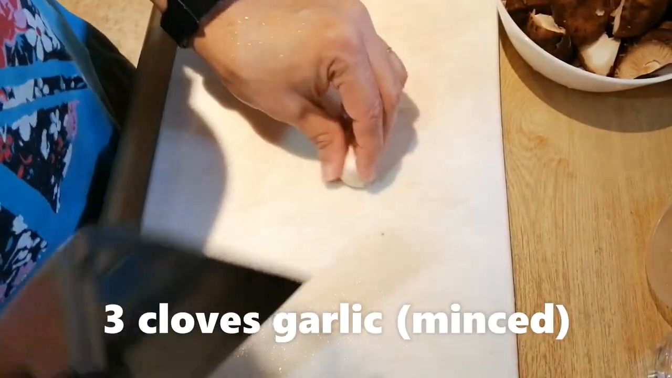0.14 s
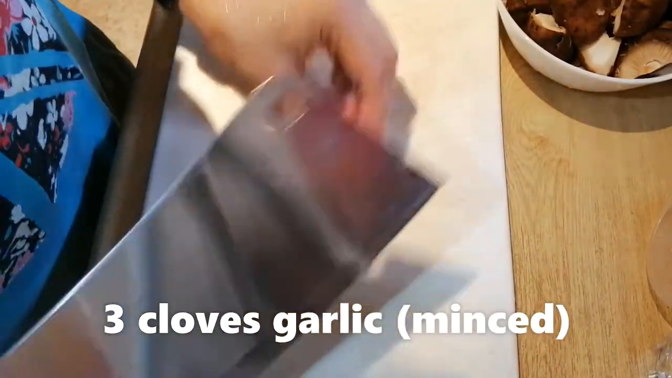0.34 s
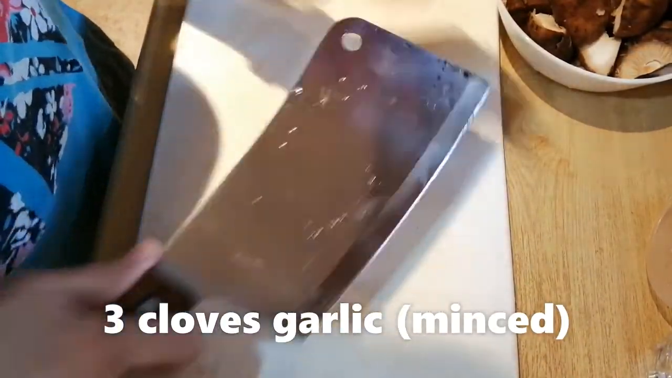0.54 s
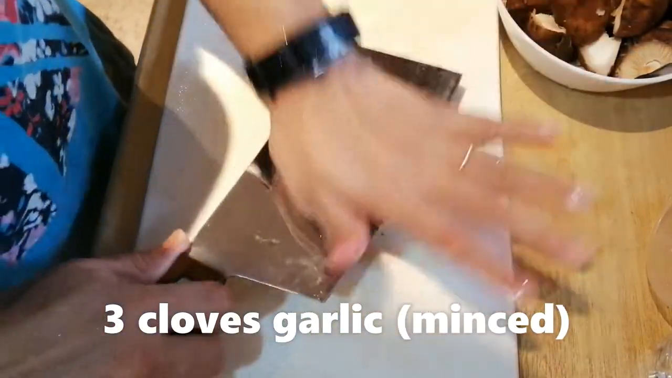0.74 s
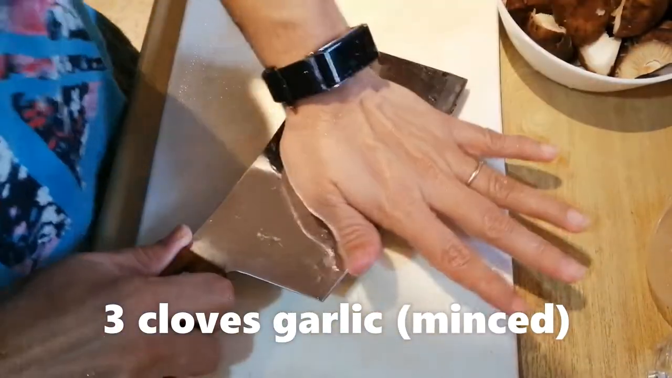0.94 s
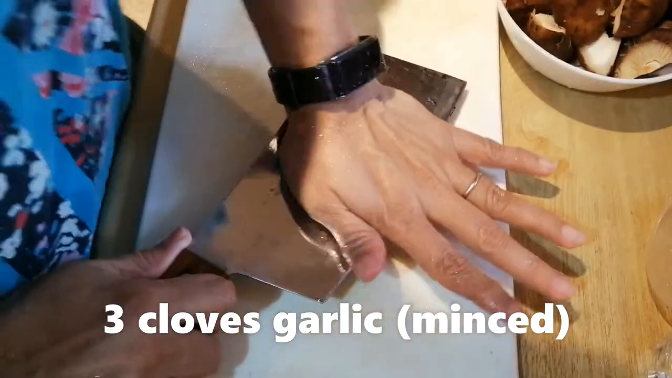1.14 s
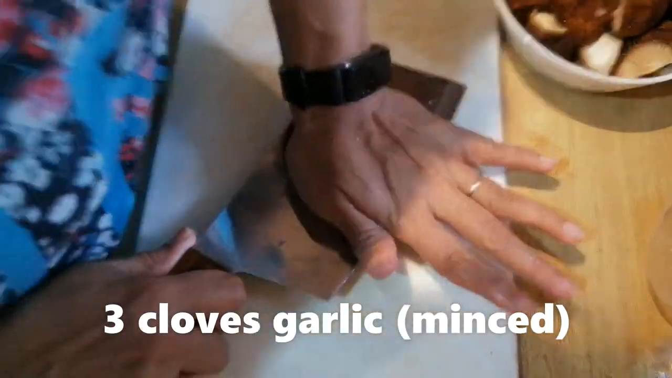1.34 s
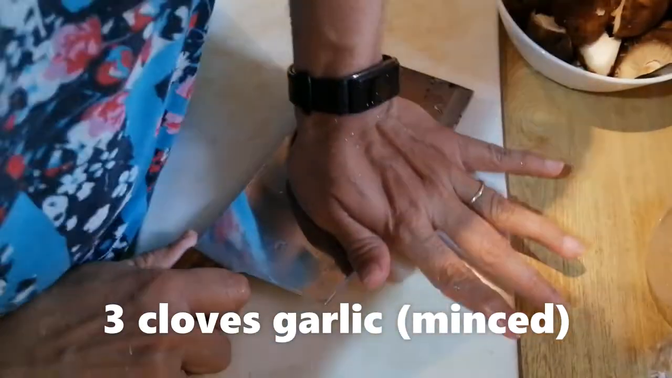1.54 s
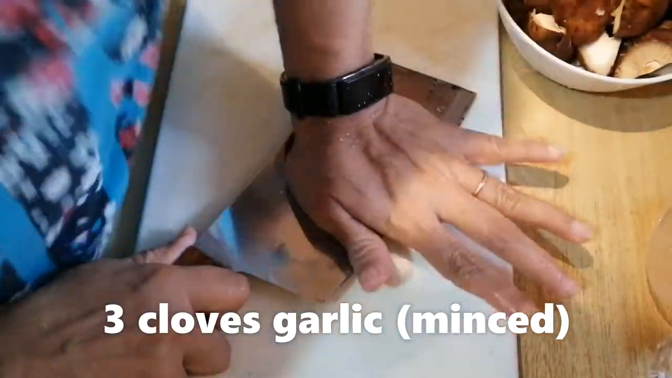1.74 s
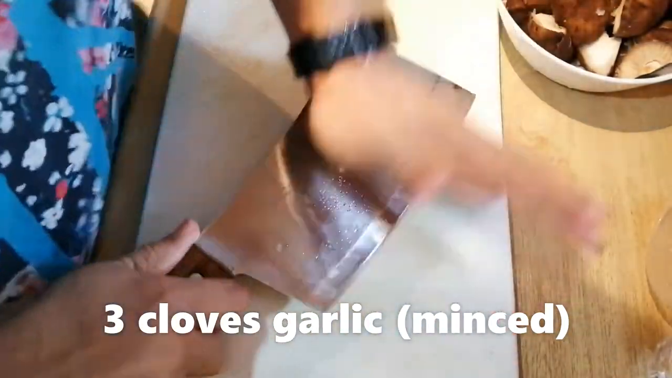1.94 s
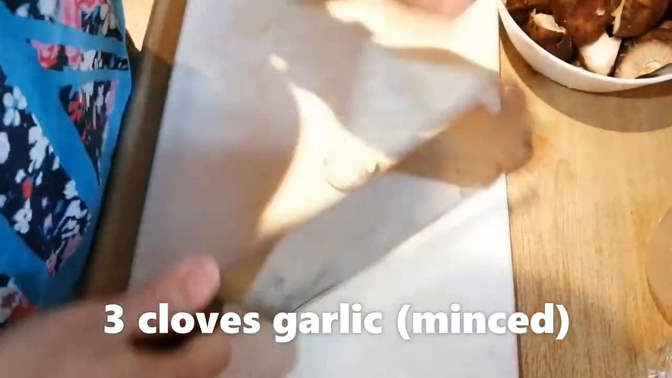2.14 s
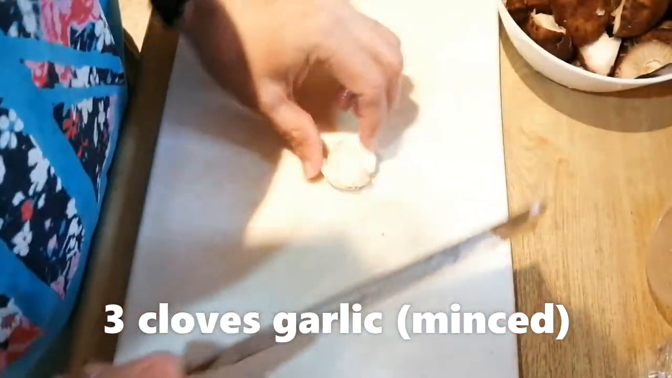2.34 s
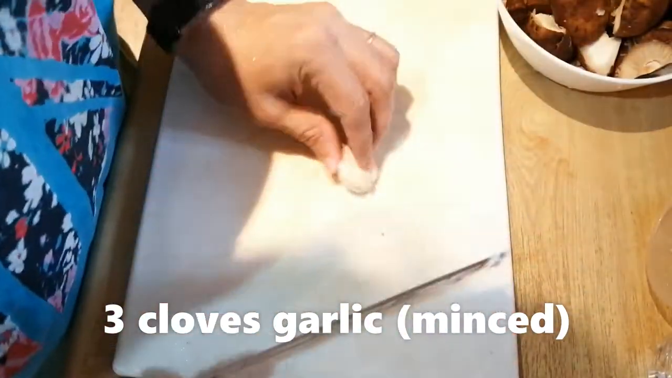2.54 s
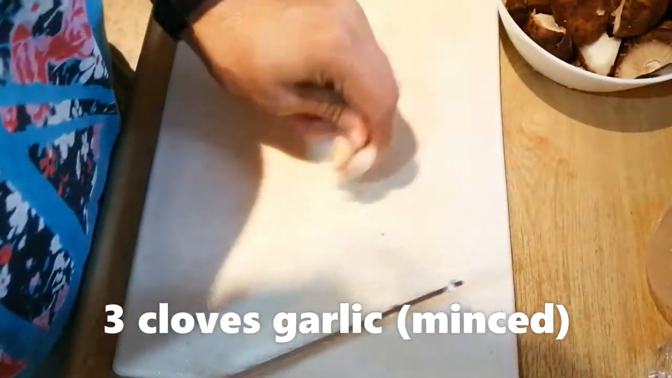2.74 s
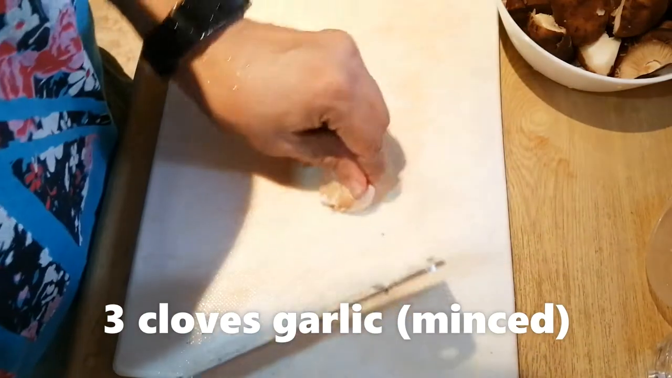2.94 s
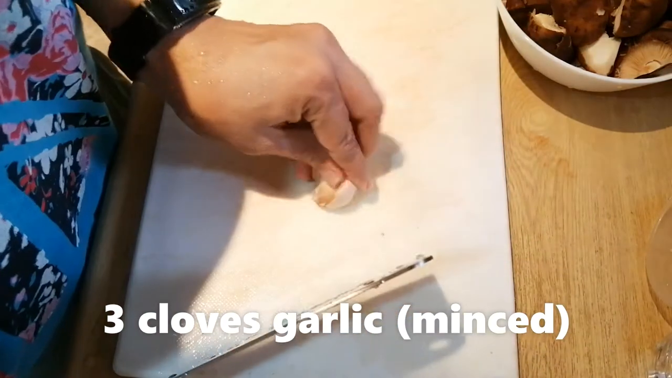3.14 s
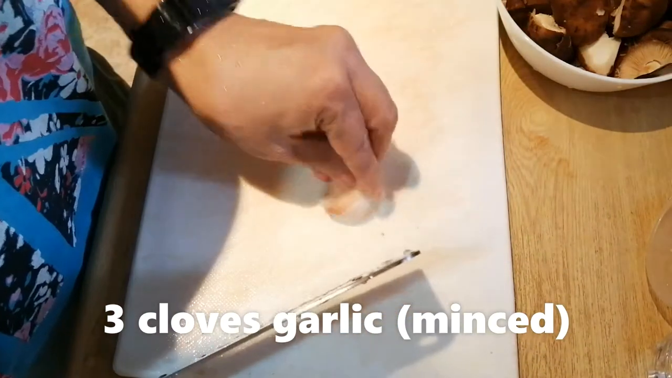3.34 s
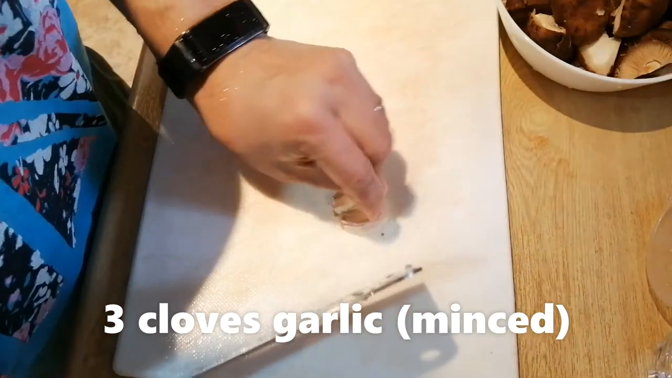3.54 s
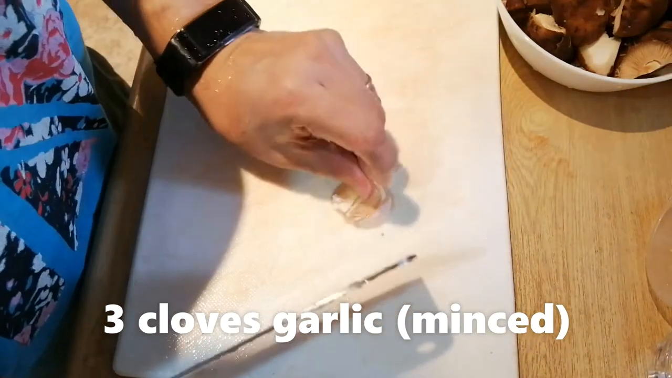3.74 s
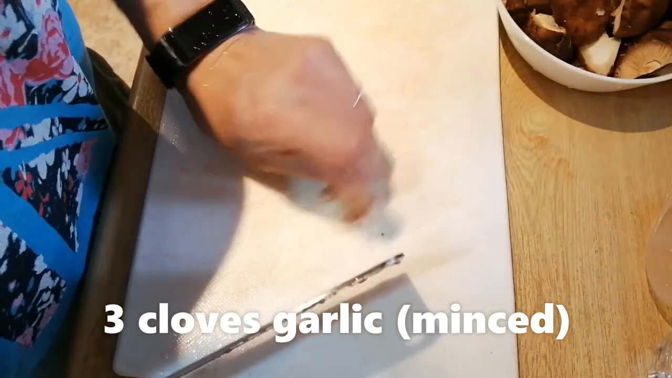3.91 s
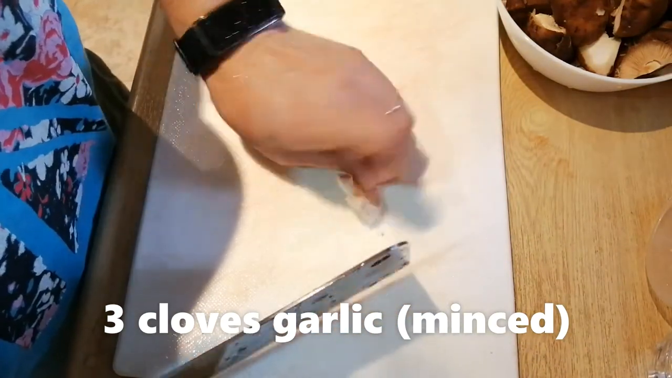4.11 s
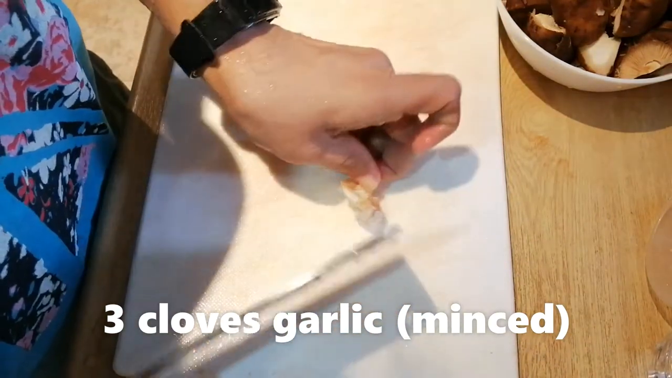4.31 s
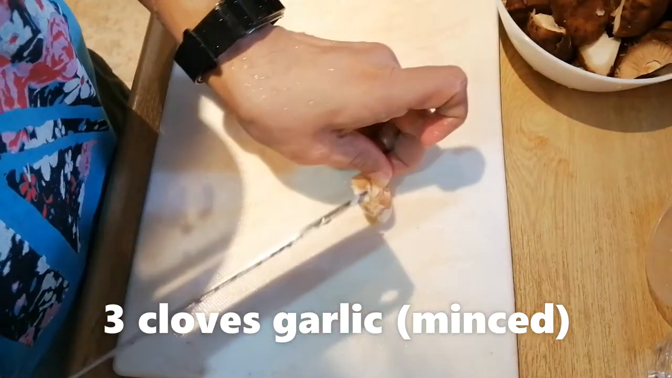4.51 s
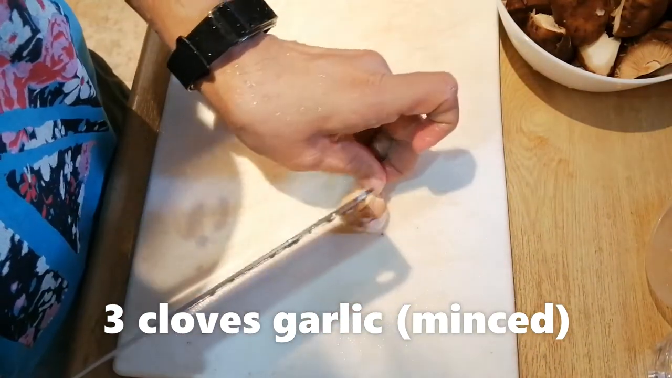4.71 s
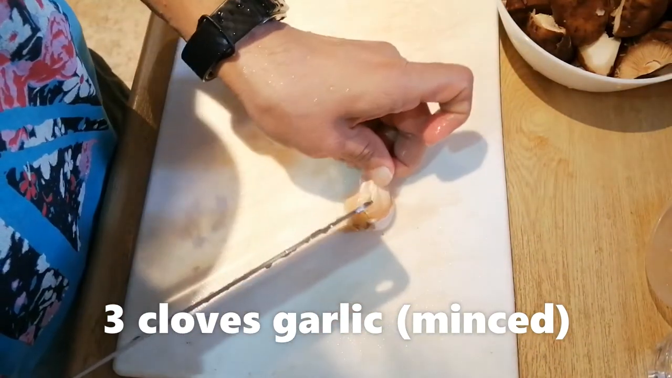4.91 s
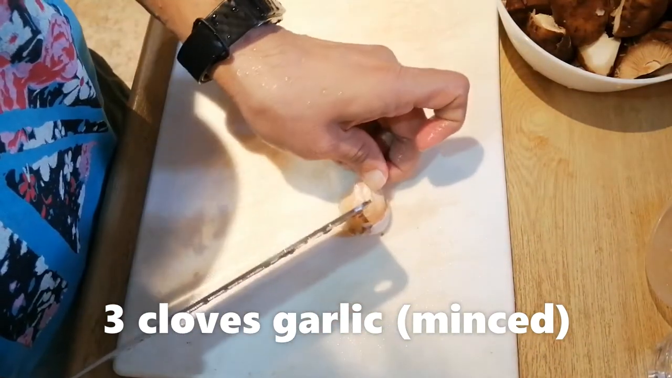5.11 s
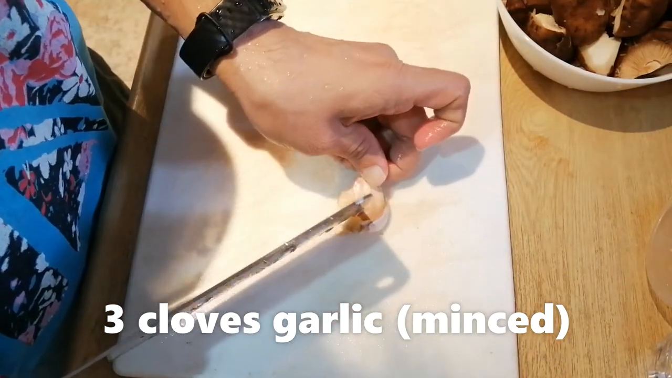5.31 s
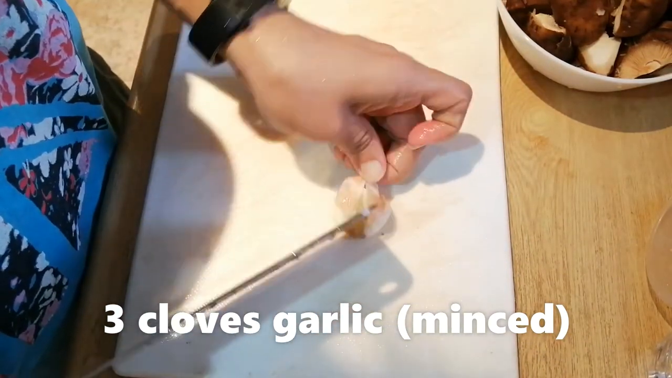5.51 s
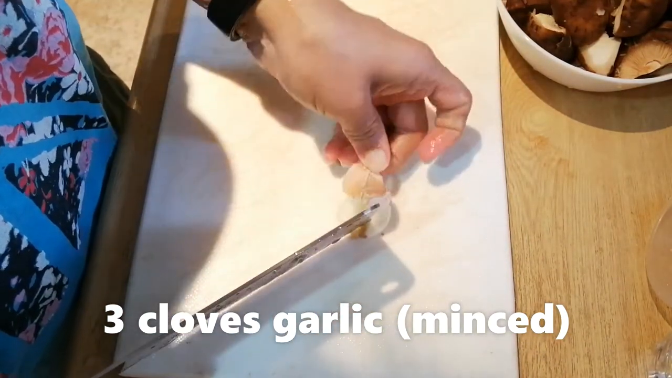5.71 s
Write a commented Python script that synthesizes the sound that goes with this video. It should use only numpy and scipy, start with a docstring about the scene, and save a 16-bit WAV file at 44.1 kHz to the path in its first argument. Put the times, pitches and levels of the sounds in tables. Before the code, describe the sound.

Close by in a hard-walled kitchen, garlic is crushed on a plastic cutting board: first a few dull thuds of a hand on a cleaver, then a loud cluster of clacks and cracks as the clove gives way. One more clack follows, and things turn much quieter, with scattered papery snaps of peeling and a short, crisp crunch of cutting near the end. Soft ventilation noise runs underneath.

```python
"""A garlic clove is crushed under the flat of a steel cleaver on a plastic cutting board, in a hard-walled kitchen.
A palm thuds onto the blade, the clove cracks and gives way in a few clacks, and the cleaver is set on its edge.
Fingers then pick at the papery skin and the edge crunches through the clove, over a low steady room noise."""
import sys
import numpy as np
from scipy import signal
from scipy.fft import rfft, irfft, next_fast_len
from scipy.io import wavfile
from scipy.ndimage import map_coordinates

SR = 44100
rng = np.random.default_rng(int(sys.argv[2]) if len(sys.argv) > 2 else 0)


def bounce(signal):
    """Save signal as a 16-bit WAV file at the path given by the first command-line argument."""
    frames = np.transpose(np.atleast_2d(signal))
    limited = np.clip(frames, -1, 1)
    pcm = np.round(limited * 32767).astype(np.int16)
    wavfile.write(sys.argv[1], SR, pcm)


N = 258426

# hard contacts of clove, blade and board: (s, clack dB, brightness Hz, board knock dB, knock cut-off Hz, room dB)
CLACKS = [(0.0171, -62, 3000, -41, 555, -1), (0.8453, -57, 1400, -46.5, 610, 7.5), (1.1397, -37, 8200, -35, 905, -1.5),
          (1.3006, -21.5, 3450, -21, 1370, -3), (1.395, -25, 7400, -26, 426, -15.5), (1.403, -29, 6440, -23, 380, -4),
          (1.4092, -27.5, 2500, -24, 360, -2), (1.486, -37.5, 9800, -30, 820, -1), (1.5337, -29.5, 5400, -33, 1610, -4),
          (1.567, -41, 7960, -39, 890, -6), (1.8957, -33, 5940, -56, 1210, 1), (5.609, -60, 5000, -65.5, 1400, 6.5)]
# soft pushes of the palm through the blade: (s, dB)
THUDS = [(0.853, -32.5), (0.876, -26.5), (0.888, -25), (0.955, -38), (1.4116, -24)]
# the board on its table: (Hz, dB, t60 s)
BOARD = [(39, -9, 0.28), (74, -5, 0.15), (109, -3.5, 0.17), (136.6, -1, 0.19), (204.6, 0.5, 0.11), (258, -7.5, 0.079), (363.6, 4, 0.038),
         (455, -10, 0.095), (531.3, -8.5, 0.13), (700, -21, 0.13)]
# the blade, damped by the hand: (Hz, width Hz, dB)
BLADE = [(2785, 420, 4.5), (5260, 810, -8.5), (7430, 360, -11), (10100, 1100, -15.5)]
# light touches that ring the blade: (s, dB)
TOUCHES = [(0.1774, -67.5), (0.3582, -65), (0.8657, -44.5), (5.574, -66)]
# lone fractures under the blade or the fingers: (s, peak dB, centre Hz)
SNAPS = [(0.883, -43.5, 10450), (0.9757, -46, 3180), (1.1111, -39, 5080), (1.6652, -31, 7300), (2.598, -43.5, 10500), (2.9502, -51.5, 4680), (3.521, -44, 9920), (4.996, -40, 4970),
         (5.4655, -40, 11500), (5.5733, -37, 11000), (5.6093, -35.5, 5050), (5.6304, -36, 10400), (5.8524, -45, 3930)]
# skin squashed, rubbed or cut: (middle s, half length s, dB, centre Hz)
RUSTLES = [(1.261, 0.0018, -47.5, 9700), (1.49, 0.11, -53.5, 7500), (1.993, 0.058, -61, 7000), (3.352, 0.25, -68, 890),
           (4.039, 0.023, -64, 9800), (4.137, 0.038, -62, 8000), (4.26, 0.011, -69.5, 9000), (4.818, 0.0048, -62, 8800),
           (4.876, 0.11, -70.5, 7500), (5.612, 0.04, -58.5, 8000), (5.61, 0.0033, -44.5, 7000)]
# spectra: (Hz, dB per Hz)
CLACK_COLOUR = [(100, -15.5), (450, -34), (950, -7.5), (1280, -8.5), (1550, -1.5), (2050, 4), (3100, -0.5), (4500, -1), (6200, -3.5), (8300, -5.5), (10800, -4.5), (12500, -15), (15500, -18)]
SKIN_COLOUR = [(200, -25), (1000, 5), (3000, -3.5), (5000, -1.5), (8000, -6), (10700, -2.5), (12500, -10), (16000, -17.5)]
AIR = [(20, -7), (55, -4), (130, -5), (200, -5), (300, -8.5), (400, -14.5), (1000, -19), (1800, -27), (2900, -27), (4300, -38.5), (7000, -39.5), (8300, -46.5), (11000, -45.5), (16000, -71)]
AIR_DB = -59
ALIKE = [(60, 0.71), (180, 0.87), (550, 0.34), (1650, 0.02), (4970, 0.02), (15000, 0.023)]  # (Hz, left-right likeness)
LEAN = [(60, -1), (180, 0), (550, -0.5), (1650, -1.5), (4970, 0.5), (15000, 0.5)]  # (Hz, left-right dB)
KITCHEN = [(100, 0.99), (300, 0.57), (700, 0.78), (2500, 0.64), (6000, 0.6), (11000, 0.44), (16000, 0.71)]  # (Hz, t60 s)
ECHO = [(60, -36), (300, -3), (540, 7.5), (700, 2), (1050, 2), (2000, -2.5), (5000, 0.5), (11000, 1.5), (12500, -4), (16000, 3)]  # (Hz, dB returned by the walls)
TOP_HZ = 15700  # fixed
# the blade pressed onto the board: (Hz, width Hz, dB above the plain clack)
PRESSED = [(990, 120, 1.5), (1580, 120, -2.5), (1710, 150, -4), (2276, 120, -0.5), (2896, 110, -2), (3700, 500, -8.5)]
CLACK_LEAN_DB = 0  # left over right
CRUSH_S = (1.1, 1.7)  # while the palm bears down, every clack also bursts the clove
BURST_DB, BURST_HZ, BURST_LAG_S, BURST_HALF_S = -39, 12000, 0.002, 0.0022
BURST_CLACK_DB = -23
BURST_SHARE = 0.3  # dB of burst for each dB that the clack is over BURST_CLACK_DB
PALM_HZ = 101  # flesh passes nothing faster
# hand and clove sliding along the steel: (start s, end s, dB)
SLIDES = [(0.17, 0.376, -72.5), (0.778, 1.35, -61), (2.15, 2.444, -72.5), (4.78, 5.305, -76)]
SLIDE_ATTACK_S, SLIDE_RELEASE_S = 0.035, 0.14
# picks at the skin: a nail catches, the flake peels, then it tears off: (start s, length s, snap dB, peeling dB)
PICKS = [(2.646, 0.029, -48.5, -59.5), (2.794, 0.0278, -51, -64), (3.1, 0.0618, -50.5, -80), (3.276, 0.051, -49.5, -83),
         (3.463, 0.0822, -47, -63), (3.758, 0.045, -51, -71), (4.089, 0.029, -39.5, -67)]
CATCH_HZ, TEAR_HZ, PEEL_HZ = 10100, 5300, 8400  # where each stage is brightest
PEEL_PEAK, PEEL_WIDTH = 0.6, 0.39  # middle and half length of the peeling, as shares of the pick
# the fan's tone and its octave: (Hz, dB, brief swell dB)
FAN = [(149.1, -66.5, 2.5), (296, -72.5, 9.5)]
FAN_WIDTH_HZ, FAN_WAVER_DB, FAN_WAVERS_PER_S = 11.7, 1.5, 2.61
HANDLING_S = (2.4, 2.8)  # the fingers turn the clove, and its skin ticks now and then
TICKS_PER_S, TICK_DB, TICK_SPREAD_DB, TICK_HZ = 7, -56.5, -4, 7500
KNOCK_LOW_HZ, PALM_LOW_HZ = 72, 42  # below these, a quick knock and a slow push move little air
# the loose clove tapped on the board: (s, dB)
TAPS = [(2.596, -60), (2.648, -68)]
TAP_RING = [(2150, 450, 0), (4300, 2200, -17)]  # (Hz, width Hz, dB)
SWELL_S, SWELL_HALF_S = 4.35, 0.099


def amp(db):
    """Decibels to gain."""
    return 10 ** (np.asarray(db) / 20)


def unit(x):
    """x at rms 1."""
    return x / np.sqrt(np.mean(x ** 2) + 1e-20)


def blow(x):
    """x with the energy of 10 ms at rms 1."""
    return unit(x) * np.sqrt(SR / 100 / x.shape[-1])  # fixed


def along(points, hz):
    """(Hz, value) points read on a log axis."""
    f, v = np.transpose(points)
    return np.interp(np.log(hz + 1), np.log(f + 1), v)


def filtered(x, gain):
    """x through the causal filter with the given gain over frequency."""
    n = x.shape[-1]
    m = 2 * next_fast_len(n // 2 + 4096)
    cepstrum = irfft(np.log(np.maximum(gain(np.fft.rfftfreq(m, 1 / SR)), 1e-6)))
    cepstrum[1:m // 2] *= 2
    cepstrum[m // 2 + 1:] = 0
    return irfft(rfft(x, m) * np.exp(rfft(cepstrum)), m)[..., :n]


def add(track, s, x):
    """Mix x into the track from time s."""
    part = track[:, max(round(s * SR), 0):][:, :x.shape[-1]]
    part += x[..., :part.shape[-1]]


def pan(db):
    """Left and right gains for a level difference."""
    return amp(np.array([np.atleast_1d(db), -np.atleast_1d(db)]) / 2)


def burst(t60, spike, size):
    """One pressure spike at both microphones, then scatter from the surfaces close by."""
    x = rng.standard_normal((2, size)) * amp(-60 * np.arange(size) / SR / t60)
    x[:, 0] = spike * np.linalg.norm(x[0])
    return x


def kitchen(x, wet_db):
    """x with a diffuse tail in which each frequency dies at its own speed."""
    hz, t, z = signal.stft(rng.standard_normal((2, SR)), SR, nperseg=256)
    tail = signal.istft(z * amp(along(ECHO, hz)[:, None] - 60 * t / along(KITCHEN, hz)[:, None]), SR, nperseg=256)[1]
    tail *= 1 - np.exp(-np.arange(tail.shape[1]) / SR / 0.002)  # reflections take a moment to build up
    tail /= np.linalg.norm(tail[0])
    return x + amp(wet_db) * signal.fftconvolve(x, tail, axes=1)[:, :x.shape[-1]]


def board(cut_hz, low_hz):
    """The board after one push: low modes and a short noisy clatter of dense higher ones; soft pushes reach only the lowest."""
    t = np.arange(SR) / SR
    ring = sum(amp(db + rng.normal(0, 1) - 60 * t / t60) * np.sin(2 * np.pi * hz * t) for hz, db, t60 in BOARD)
    dense = filtered(burst(t60=0.033, spike=0.076, size=SR), lambda hz: 1 / np.hypot(1, np.log2((hz + 1) / 830) ** 2))
    both = unit(ring) * pan(5.2) + amp(-8) * unit(dense)
    radiated = lambda hz: (hz / np.hypot(hz, low_hz)) ** 3  # slow motion pushes little air
    return blow(filtered(both, lambda hz: radiated(hz) / np.hypot(1, (hz / cut_hz) ** 2)))


def steel(hz):
    """Gain of the free blade."""
    return resonances(BLADE, hz)


def crush():
    """The palm leans on the blade; each time the clove gives, it bursts and the steel clacks and knocks the board."""
    out = np.zeros((2, N))
    for s, db, bright_hz, knock_db, knock_hz, room_db in CLACKS:
        pressed = CRUSH_S[0] < s < CRUSH_S[1]
        colour = lambda hz: amp(along(CLACK_COLOUR, hz)) * (1 + pressed * resonances(PRESSED, hz)) / np.hypot(1, (hz / bright_hz) ** 3)
        clack = blow(filtered(burst(t60=0.026, spike=0.45, size=SR), colour)) * pan(CLACK_LEAN_DB)
        add(out, s, kitchen(amp(db) * clack + amp(knock_db) * board(knock_hz, KNOCK_LOW_HZ), room_db))
        if pressed:
            juice = crackle(BURST_HALF_S, BURST_DB + BURST_SHARE * (db - BURST_CLACK_DB), BURST_HZ)
            add(out, s + BURST_LAG_S - .5, kitchen(juice, wet_db=-5))
    for s, db in THUDS:
        add(out, s, kitchen(amp(db) * board(PALM_HZ, PALM_LOW_HZ), wet_db=-3.5))
    return out


def blade():
    """Touches and sliding friction excite the same damped resonances of the steel; sliding also hisses broadly."""
    t = np.arange(N) / SR
    friction = lambda hz: steel(hz) + amp(1.0) * hz / (hz + 300) / np.hypot(1, (hz / 3000) ** 1.52)
    strokes = sum(amp(db) * np.exp(-np.maximum(start - t, 0) / SLIDE_ATTACK_S - np.maximum(t - end, 0) / SLIDE_RELEASE_S)
                  for start, end, db in SLIDES)
    out = strokes * unit(filtered(rng.standard_normal((2, N)), friction))
    for s, db in TOUCHES:
        add(out, s, amp(db) * blow(filtered(burst(t60=0.001, spike=2.7, size=SR // 10), steel)) * pan(9.6))
    return kitchen(out, wet_db=-4)


def snaps():
    """Single fractures of the skin, each with its own brightness."""
    out = np.zeros((2, N))
    for s, db, centre_hz in SNAPS:
        add(out, s, snap(db, centre_hz))
    return kitchen(out, wet_db=-7.0)


def rustle():
    """The skin crackles while it is squashed, rubbed or cut."""
    out = np.zeros((2, N))
    for s, half_s, db, centre_hz in RUSTLES:
        add(out, s - .5, crackle(half_s, db, centre_hz))
    return kitchen(out, wet_db=-5.0)


def air():
    """Steady ventilation noise, alike at both microphones only in the bass."""
    turn = lambda hz: np.arccos(np.clip(along(ALIKE, hz), 0, .99)) / 2
    mid = filtered(rng.standard_normal(N), lambda hz: amp(along(AIR, hz)))
    side = filtered(rng.standard_normal(N), lambda hz: amp(along(AIR, hz)) * np.tan(turn(hz)))
    pair = [filtered(mid + sign * side, lambda hz: amp(sign * along(LEAN, hz) / 2)) for sign in (1, -1)]
    return amp(AIR_DB) * np.array(pair) / np.std(mid)


def hum():
    """A low fan tone and its octave, each a narrow band whose level wavers; the hum swells once."""
    band = lambda centre: unit(filtered(rng.standard_normal(N), lambda hz: 1 / (1 + ((hz - centre) / FAN_WIDTH_HZ) ** 2)))
    swell = np.exp(-((np.arange(N) / SR - SWELL_S) / SWELL_HALF_S) ** 2 / 2)
    return sum(amp(db + swell_db * swell + FAN_WAVER_DB * wobble(FAN_WAVERS_PER_S)) * band(hz) for hz, db, swell_db in FAN)


def resonances(modes, hz):
    """Gain of a set of (Hz, width, dB) resonances."""
    return sum(amp(db) / (1 + (2 * (hz - centre) / width) ** 2) for centre, width, db in modes)


def skin(centre_hz):
    """Gain of a skin fracture that is brightest near the given frequency."""
    return lambda hz: amp(along(SKIN_COLOUR, hz)) / np.hypot(1, np.log2((hz + 1) / centre_hz) / 0.5)


def wobble(rate):
    """A smooth random curve, rate knots a second."""
    return map_coordinates(rng.standard_normal(int(N * rate / SR) + 4), [np.arange(N) * rate / SR])


def snap(db, centre_hz):
    """One fracture of the dry skin."""
    return amp(db - 16.5) * blow(filtered(burst(t60=0.016, spike=0.31, size=SR // 20), skin(centre_hz)))


def crackle(half_s, db, centre_hz):
    """A swell of dense tiny fractures of uneven size, in the middle of one second."""
    t = np.arange(SR) / SR - .5
    fractures = (rng.random(SR) < 2600 / SR) * amp(3.1 * rng.standard_normal(SR))  # fixed
    grains = fractures * rng.standard_normal((2, SR))  # each one radiates differently towards the two microphones
    return amp(db) * np.exp(-(t / half_s) ** 2 / 2) * unit(filtered(grains, skin(centre_hz)))


def picks():
    """Each pick is a bright catch, a swell of peeling and a duller snap as the flake comes away."""
    out = np.zeros((2, N))
    for s, length, snap_db, peel_db in PICKS:
        add(out, s, snap(snap_db, CATCH_HZ))
        add(out, s + PEEL_PEAK * length - .5, crackle(PEEL_WIDTH * length, peel_db, PEEL_HZ))
        add(out, s + length, snap(snap_db, TEAR_HZ))
    return kitchen(out, wet_db=-4.0)


def ticks():
    """Faint chance ticks of the skin between the picks."""
    out = np.zeros((2, N))
    start, end = HANDLING_S
    for when, size, pitch in rng.random((round(TICKS_PER_S * (end - start)), 3)):
        add(out, start + when * (end - start), snap(TICK_DB + TICK_SPREAD_DB * (2 * size - 1), TICK_HZ * 2 ** (pitch - .5)))
    return kitchen(out, wet_db=3)


def taps():
    """The clove is set down and settles with a small hollow tick."""
    out = np.zeros((2, N))
    for s, db in TAPS:
        add(out, s, amp(db) * blow(filtered(burst(t60=0.012, spike=0.44, size=SR // 10), lambda hz: resonances(TAP_RING, hz))))
    return kitchen(out, wet_db=1.5)


def scene():
    """Everything that sounds on and around the board."""
    return crush() + blade() + taps() + picks() + snaps() + ticks() + rustle() + air() + hum()


def record(dry):
    """The recorder keeps nothing above its band limit."""
    m = next_fast_len(N + 8192)
    return irfft(rfft(dry, m) / np.hypot(1, (np.fft.rfftfreq(m, 1 / SR) / TOP_HZ) ** 60), m)[:, :N]  # fixed


dry = scene()
out = record(dry)
bounce(out)
```